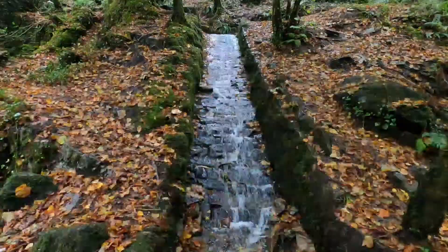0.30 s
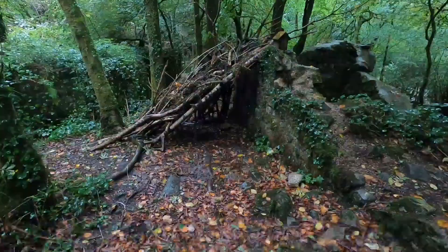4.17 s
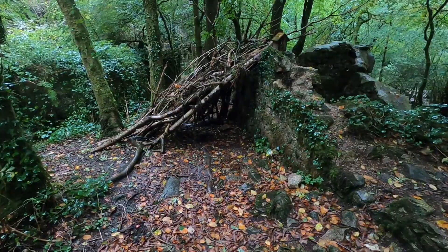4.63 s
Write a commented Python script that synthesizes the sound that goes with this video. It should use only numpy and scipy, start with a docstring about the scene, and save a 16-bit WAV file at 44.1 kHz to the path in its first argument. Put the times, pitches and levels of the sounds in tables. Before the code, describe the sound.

A stream is heard from its bank in wide stereo, with a quick tick of drops, and cuts off at 0.3 seconds. At 0.5 seconds the water swells back in, louder, close and almost mono, rushing down a narrow stepped stone channel as dense bubbles and spray over a steady wash. Hollow gulps and plops stand out, most clearly around 0.8, 1.5, 1.9 and 4.1 seconds. Soft dull knocks come at about 3.5 and 4.1 seconds, while the water widens slightly. It stops dead at 4.3 seconds. From about 4.5 seconds a much quieter hiss of woodland rain fades in, with a light patter, easing a little after 5 seconds. A dull knock and a sharp drip land at 4.6 seconds. More single drops tick on nearby leaves and stone at roughly 5.3, 5.9 and 6.2 seconds.

```python
"""Water rushes down a narrow stepped stone channel: a dense swarm of ringing bubbles and spray over a wash,
with a few big gulps as air pockets close. It is heard from the bank in full stereo, then close by and
almost mono. After a cut, soft rain hisses in woodland. Single drops hit leaves and stone nearby, among
a few dull knocks. The later shots fade in, and every cut stops the sound dead."""
import sys
import numpy as np
from scipy import signal
from scipy.fft import rfft, irfft
from scipy.io import wavfile

SR = 44100
rng = np.random.default_rng(int(sys.argv[2]) if len(sys.argv) > 2 else 0)


def put_to_file(sound):
    """Save the sound as 16-bit audio at rate SR, in the file named by the first command-line argument."""
    columns = np.atleast_2d(sound).T  # one column per channel
    safe = np.clip(columns, -1, 1)
    whole_steps = np.round(safe * 32767)
    wavfile.write(sys.argv[1], SR, whole_steps.astype(np.int16))


N = 273861
T = np.arange(N) / SR
BANK_SHOT, CHANNEL_SHOT, WOOD_SHOT = (-1, .292), (.503, 4.283), (4.458, 7)   # (start [s], end [s])


def from_db(db):
    """Decibels to gain."""
    return 10 ** (np.asarray(db) / 20)


def unit_rms(x):
    """Scale to rms 1."""
    return x / np.sqrt(np.mean(x ** 2) + 1e-20)


def automation(points):
    """Straight ramps through (time, value) points, at every sample."""
    return np.interp(T, *np.transpose(points))


def drift(rate_hz):
    """Slow random modulation with a spread of about 1."""
    hop, run_in = 40, 2000
    pole = np.exp(-2 * np.pi * rate_hz * hop / SR)
    noise = rng.standard_normal(N // hop + run_in + 2)
    slow = signal.lfilter([1], [1, -2 * pole, pole * pole], noise)[run_in:]
    return np.interp(np.arange(N) / hop, np.arange(len(slow)), unit_rms(slow))


def butter(x, hz, kind):
    """Gentle low-, high- or band-pass."""
    return signal.sosfilt(signal.butter(2, hz, kind, fs=SR, output="sos"), x)


def below(x, hz):
    """The band under a crossover, with no phase shift."""
    return signal.sosfiltfilt(signal.butter(2, hz, fs=SR, output="sos"), x)


def equalise(x, curve, modes=()):
    """Minimum-phase EQ: a smooth curve with a few bells on top."""
    hz = np.maximum(np.arange(N // 2 + 1) * SR / N, 1)
    points_hz, points_db = np.transpose(curve)
    db = np.interp(np.log(hz), np.log(points_hz), points_db)
    for centre, width, height in modes:
        db = db + height / (1 + (2 * (hz - centre) / width) ** 2)
    cepstrum = irfft(np.log(from_db(db)), N)
    cepstrum[1:N // 2] *= 2
    cepstrum[N // 2:] = 0
    return irfft(rfft(x) * np.exp(rfft(cepstrum)), N)


def stereo_side(x, width):
    """A diffuse copy shaped by a width curve, in opposite polarity left and right."""
    random_phase = np.exp(2j * np.pi * rng.random(N // 2 + 1))
    diffuse = irfft(np.abs(rfft(x)) * random_phase, N)
    return equalise(diffuse, width) * np.array([[1], [-1]])


def place(out, start_s, peak_db, pulse):
    """Mix a one-shot into out at a time and a peak level."""
    at = round(start_s * SR)
    out[at:at + len(pulse)] += (from_db(peak_db) * pulse / np.abs(pulse).max())[:N - at]


def shot_fader(span, swell_s=.094, cut_s=.002):
    """A shot swells in from silence and stops dead."""
    start, end = span
    swell = (1 - np.exp(-np.maximum(T - start, 0) / swell_s)) ** 2
    return swell * np.clip((end - T) / cut_s, 0, 1)


# Near-mono image, wide only at the very top: (frequency [Hz], side minus mid [dB])
NARROW_IMAGE = [(60, -42), (1300, -71), (4400, -64.5), (10000, -40), (12000, 0), (15000, 2.5)]


def settle(x, span, dull_db=-17, clear_s=.9, mono_s=.75):
    """A shot starts dull and mono; its top clears, then spreads."""
    age = T - span[0]
    body = below(x, hz=10500)
    top_gain = from_db(dull_db * np.clip(1 - age / clear_s, 0, 1))
    mid = body + (x - body) * top_gain
    spread = np.clip((age - mono_s) / .15, 0, 1)
    return mid + spread * stereo_side(mid, NARROW_IMAGE)


def impacts(per_s, spread_db):
    """Clicks at random moments, many small and few large."""
    at = np.flatnonzero(rng.random(N) < per_s / SR)
    size_db = spread_db * np.minimum(rng.exponential(1, len(at)), 5)
    clicks = np.zeros(N)
    clicks[at] = from_db(size_db) * rng.choice([-1, 1], len(at))
    return clicks


def ring(drive, hz, cycles):
    """A resonator: each click rings as a sine that dies by 60 dB in so many cycles."""
    pole = from_db(-60 * hz / (cycles * SR))
    angle = 2 * np.pi * hz / SR
    return signal.lfilter([1, 0, -1], [1, -2 * pole * np.cos(angle), pole * pole], drive + 1e-18) / 2


def bubbles(per_s, spread_db, cycles, clump_db):
    """Ringing bubbles of all sizes arrive in clumps, even in power per Hz; small ones come more often."""
    pitches = np.geomspace(150, 13000, 36)
    shares = np.sqrt(pitches) / np.sqrt(pitches).sum()
    swarm = np.zeros(N)
    for hz, share in zip(pitches, shares):
        clumping = from_db(clump_db * drift(rate_hz=12))
        births = impacts(per_s * share * clumping, spread_db)
        swarm += np.sqrt(hz) * unit_rms(ring(births, hz, cycles))
    return unit_rms(swarm)


def plop(hz, cycles, rise=0):
    """A soft-edged sine that dies by 60 dB in so many cycles, bending up by the fraction rise."""
    age_cycles = np.arange(int(cycles * SR / hz)) * hz / SR
    progress = age_cycles / cycles
    envelope = (1 - np.exp(-2 * age_cycles)) * from_db(-60 * progress)
    return envelope * np.sin(2 * np.pi * age_cycles * (1 + rise * progress / 2))


# Tone of the rain bed: (frequency [Hz], gain [dB])
RAIN_EQ = [(15, -37), (25, -1.5), (64, -4), (128, -8), (154, -3), (196, -1), (237, -3), (438, -6),
           (529, -5.5), (879, -10), (1420, -7), (1580, -9), (3260, -12), (8320, -24.5), (15000, -47.5)]
# Hollow resonances of the wood, and a dip in the treble: (centre [Hz], width [Hz], gain [dB])
WOOD_BELLS = [(210, 100, 1), (1470, 160, 1), (7100, 1200, -4)]
# Strength of the shower: (time [s], level at 400-8000 Hz [dB])
RAIN_LEVEL = [(4.7, -42.5), (4.978, -42.5), (5.422, -45.5), (6.2, -45)]


def rain():
    """Countless far drops merge into a hiss, with a light patter and plips from nearer ones."""
    patter = unit_rms(impacts(per_s=250, spread_db=4))
    plips = bubbles(per_s=5000, spread_db=1.0, cycles=21, clump_db=1.5)
    hiss = rng.standard_normal(N)
    bed = equalise(hiss + from_db(-17) * patter + from_db(-6.5) * plips, RAIN_EQ, WOOD_BELLS)
    bed /= np.std(butter(bed, [400, 8000], "band"))
    return from_db(automation(RAIN_LEVEL)) * settle(bed, WOOD_SHOT)


# Soft low knocks: (time [s], peak level [dB], pitch [Hz])
KNOCK_CUES = [(3.466, -30, 236), (4.144, -27, 210), (4.601, -30, 690), (4.601, -35, 260)]


def knocks():
    """Dull knocks hold their pitch and die within a few cycles."""
    out = np.zeros(N)
    for start_s, peak_db, hz in KNOCK_CUES:
        place(out, start_s, peak_db, plop(hz, cycles=4.1))
    return out


# Near drops on leaves and stone: (time [s], peak level [dB], ring pitch [Hz])
DROP_CUES = [(0.072, -25, 2600), (0.0756, -27.5, 4350), (2.1455, -25, 3320), (2.58, -29, 9000),
             (3.46, -30.5, 8800), (4.6225, -26, 3380), (5.2649, -34, 3600), (5.9374, -36, 5000),
             (6.1694, -30, 2730)]


def drops(splash_decay_s=.0038, tick_gain=3.5, spatter_gain=.12):
    """A drop ticks and splashes briefly; this drives the surface's dead ring, with spatter around it."""
    out, age = np.zeros(N), T[:SR // 30]
    for start_s, peak_db, hz in DROP_CUES:
        splash = rng.standard_normal(len(age)) * np.exp(-age / splash_decay_s)
        splash[0] += tick_gain
        hit = ring(splash, hz, cycles=4.7) + spatter_gain * butter(splash, hz / 2, "high")
        place(out, start_s, peak_db, butter(hit, 6500, "low"))
    return out


# Big air pockets closing in the steps: (time [s], ring peak [dB], pitch [Hz], ring length [cycles])
GULP_CUES = [(0.617, -27, 960, 12), (0.762, -21.5, 950, 13), (0.843, -27, 1040, 14),
             (0.933, -23.5, 3120, 61), (1.5161, -19, 1020, 17), (1.943, -19.5, 1110, 4.9),
             (2.31, -24.5, 1870, 54), (3.066, -25.5, 982, 65), (3.259, -26, 1360, 67),
             (3.462, -21.5, 496, 4), (4.115, -18.5, 1000, 5.6), (4.221, -22, 1960, 13)]


def gulps(slap_decay_s=.0018, slap_db=-4.5):
    """Air pockets close with a slap and ring, rising in pitch as they near the surface."""
    out, age = np.zeros(N), T[:SR // 30]
    for start_s, peak_db, hz, cycles in GULP_CUES:
        burst = rng.standard_normal(len(age)) * np.exp(-age / slap_decay_s)
        slap = butter(burst, [hz / 2, 2 * hz], "band")
        place(out, start_s, peak_db, plop(hz, cycles, rise=.146))
        place(out, start_s, peak_db + slap_db, slap)
    return out


def rushing_water():
    """Bubbles and sharp splashes over a smooth wash, all surging together; a few ring on as plinks."""
    swarm = bubbles(per_s=9000, spread_db=1.5, cycles=14.6, clump_db=2)
    plinks = bubbles(per_s=600, spread_db=2.2, cycles=59, clump_db=2)
    splashes = unit_rms(impacts(per_s=2500, spread_db=1.5))
    wash = rng.standard_normal(N)
    water = swarm + from_db(-8.5) * plinks + from_db(-3) * splashes + from_db(-.5) * wash
    surge = from_db(.31 * drift(rate_hz=14))
    return unit_rms(water) * surge


# Tone of the stream from the bank: (frequency [Hz], gain [dB])
BANK_EQ = [(18, -42.5), (30, 14.5), (76, -0.5), (223, 5.5), (383, -3.5), (521, 1), (786, -1.5), (1790, 2),
           (7170, -14), (14000, -34.5)]
# Stereo image on the bank, wider towards the treble: (frequency [Hz], side minus mid [dB])
BANK_IMAGE = [(200, -22), (700, -10), (1700, -4), (2600, -1.5), (4400, 0), (12000, 2)]


def stream_from_bank(gain_db=-37.5):
    """The stream from a few steps away, a little to the left."""
    water = equalise(rushing_water(), BANK_EQ)
    mid = unit_rms(butter(water, 45, "high"))
    pan = from_db([[1.4], [-1.5]])
    return from_db(gain_db) * (mid + stereo_side(mid, BANK_IMAGE)) * pan


# Tone of the stream close up: (frequency [Hz], gain [dB])
CLOSE_EQ = [(15, -16.5), (25, -3), (59, 1), (103, -3.5), (167, -1.5), (318, -3.5), (691, -3), (1060, 0.5),
            (1860, 0), (2500, -3.5), (3350, -3.5), (6900, -16), (8320, -19), (12800, -32), (15000, -39)]
# Hollow resonances of the channel, and a dip in the treble: (centre [Hz], width [Hz], gain [dB])
CHANNEL_BELLS = [(195, 80, 1), (995, 210, 2), (3350, 700, 0.5), (7200, 1300, -1.5), (8300, 1500, 1)]
# Strength of the flow: (time [s], level at 500-6000 Hz [dB])
FLOW_LEVEL = [(0.75, -29.5), (1.87, -32.5), (4.05, -31.5)]
# Stereo image that the close stream opens towards: (frequency [Hz], side minus mid [dB])
OPEN_IMAGE = [(200, -11), (1300, -16), (2400, -7), (8000, 4)]


def stream_close(churn_db_per_flow_db=.5, churn_db_per_s=.9, opens_at_s=3.18, opening_per_s=.3):
    """The stream in its channel; large bubbles churn in the lows, more with the flow and over time."""
    flow_db = automation(FLOW_LEVEL)
    churn_db = churn_db_per_flow_db * (flow_db - flow_db.mean())
    churn_db += churn_db_per_s * (T - np.mean(CHANNEL_SHOT))
    water = equalise(rushing_water(), CLOSE_EQ, CHANNEL_BELLS)
    water /= np.std(butter(water, [500, 6000], "band"))
    churn = (from_db(churn_db) - 1) * below(water, hz=360)
    mid = from_db(flow_db) * (water + churn)
    opening = np.clip(opening_per_s * (T - opens_at_s), 0, 1)
    return settle(mid, CHANNEL_SHOT) + opening * stereo_side(mid, OPEN_IMAGE)


def scene():
    """Three beds in turn, with close gulps, knocks and drops in the centre."""
    bank = stream_from_bank() * shot_fader(BANK_SHOT)
    channel = stream_close() * shot_fader(CHANNEL_SHOT)
    wood = rain() * shot_fader(WOOD_SHOT)
    return bank + channel + wood + gulps() + knocks() + drops()


def record(dry):
    """A steep high cut at 15.2 kHz on the whole mix."""
    return signal.sosfilt(signal.ellip(10, .1, 80, 15200, fs=SR, output="sos"), dry)


dry = scene()
out = record(dry)
put_to_file(out)
```